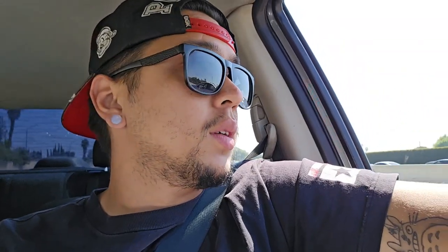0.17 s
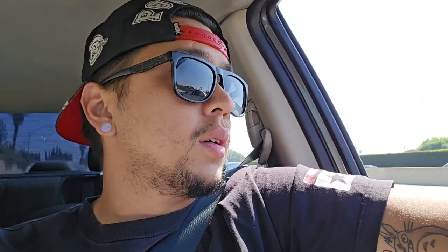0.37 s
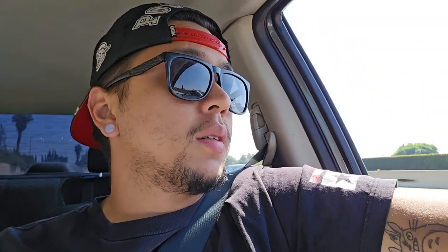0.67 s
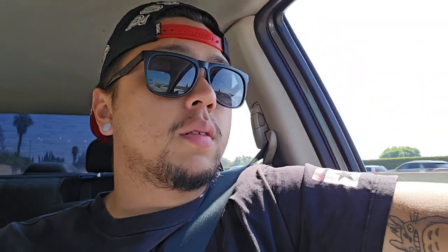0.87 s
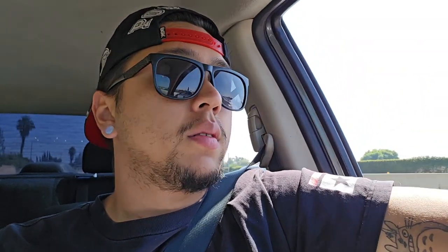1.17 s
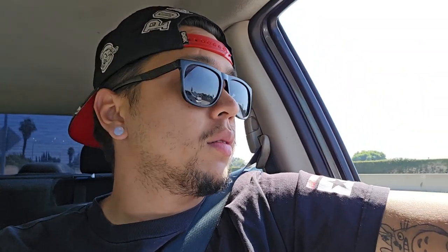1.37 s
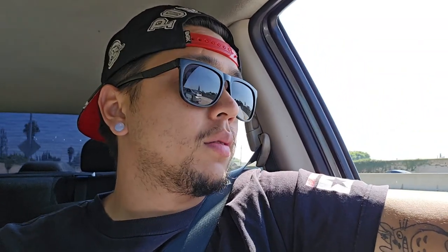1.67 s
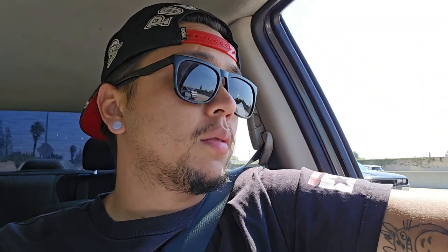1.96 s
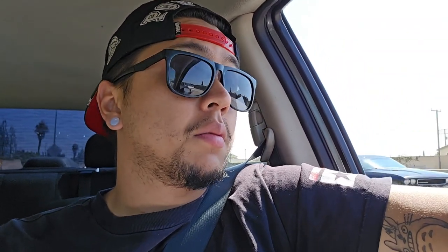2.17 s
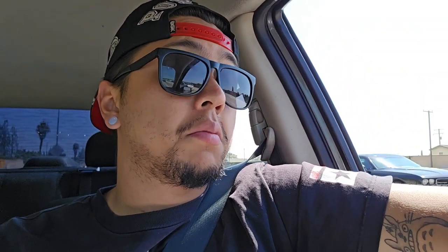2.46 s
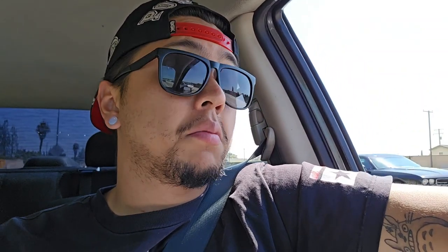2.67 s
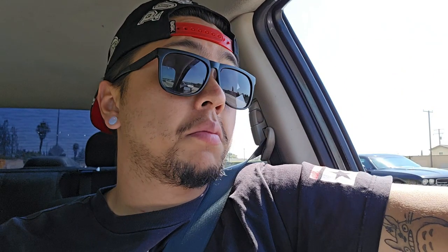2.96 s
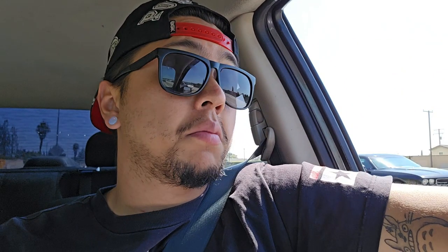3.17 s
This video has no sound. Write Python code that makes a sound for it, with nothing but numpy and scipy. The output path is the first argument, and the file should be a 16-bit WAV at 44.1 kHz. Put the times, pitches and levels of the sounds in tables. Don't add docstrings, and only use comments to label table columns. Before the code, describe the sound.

Deep road and wind rumble fills a car cabin throughout, mostly below 100 Hz, pulsing irregularly about eight times a second. Quieter tyre roar and thin window hiss lie above, the hiss easing around 1-2 s. Soft seam thumps scatter throughout; a small plastic tick snaps at 0.24 s. Around 2.4-2.6 s a neighbouring car's tyre noise swells modestly, with brief faint panel notes. Close phone stereo; it never stops.

```python
import sys
import numpy as np
from scipy import signal
from scipy.fft import rfft, irfft
from scipy.io import wavfile
from scipy.ndimage import uniform_filter1d

SR = 44100
rng = np.random.default_rng(int(sys.argv[2]) if len(sys.argv) > 2 else 0)


def pcm_store(signal):
    levels = np.round(np.clip(np.atleast_2d(signal), -1, 1) * 32767)
    wavfile.write(sys.argv[1], SR, levels.astype(np.int16).T)


def rack_gain(trim_db):
    fader = np.asarray(trim_db, float)
    return 10 ** (fader / 20)


N = 145530


def evened(x):
    return x / np.sqrt(np.mean(x ** 2) + 1e-20)


def smoothed(x, span):
    return uniform_filter1d(uniform_filter1d(x, span), span)


def low_part(x, corner_hz, order):
    hz = np.fft.rfftfreq(N, 1 / SR)
    return irfft(rfft(x) / (1 + (hz / corner_hz) ** order), N)


def read(points, hz):
    f, value = np.transpose(points)
    return np.interp(np.log(hz + 1), np.log(f + 1), value)


def closed(points, hz):
    low, top = points[0][0], points[-1][0]
    octaves_out = np.log2(np.maximum(low / (hz + 1), 1) * np.maximum(hz / top, 1))
    return read(points, hz) - 18 * octaves_out


def bumps(table, hz):
    return sum(lift / (1 + (2 * (hz - f) / width) ** 2) for f, width, lift in table)


def wander(rate_hz):
    t = np.arange(N) / SR
    rates = rate_hz * np.geomspace(1 / 20, 1, num=20)
    return evened(sum(np.sin(2 * np.pi * (f * t + rng.random())) / np.sqrt(f) for f in rates))


def along(table, column=1):
    rows = np.transpose(table)
    return np.interp(np.arange(N) / SR, rows[0], rows[column])


# frequency in Hz, lead of the left port in radians.
PORT_LEAD = [(0, -.3), (300, 0.05), (700, 1.3), (1300, 3.5), (2050, 6.9), (3000, 10.5), (16000, 57)]


def port_lag(hz):
    return np.array([[0], [1]]) * np.interp(hz, *np.transpose(PORT_LEAD))


# frequency in Hz, correlation from 0 to 1.
PORT_LIKENESS = [(45, .97), (170, .8), (350, .55), (600, .55), (900, .2), (1300, .5), (2050, .65),
                 (2500, .42), (6000, .3)]


def cabin_noise(colour, size, patch_db, patch_hz, patch_s):
    hop = size // 4
    hz = np.fft.rfftfreq(size, 1 / SR)
    a, b, c, d, patches = rng.standard_normal((N // hop + 5, len(hz), 5)).T
    patches = uniform_filter1d(patches, max(int(patch_hz * size / SR), 1), axis=0)
    patches = uniform_filter1d(patches, max(int(patch_s * SR / hop), 1), axis=1)
    same = np.clip(read(PORT_LIKENESS, hz), 0, 1)[:, None]
    turn = np.exp(-1j * port_lag(hz)[1])[:, None]
    left = a + 1j * b
    right = same * turn * left + np.sqrt(1 - same ** 2) * (c + 1j * d)
    z = np.array([left, right]) * rack_gain(colour(hz)[:, None] + patch_db * evened(patches))
    return evened(signal.istft(z, nperseg=size, noverlap=size - hop)[1][:, :N])


# peak time in seconds, peak in dB, length in seconds.
GUST_TIMES = [(0.022, -20, .08), (0.144, -13.5, 0.042), (.23, -21, 0.049), (0.326, -15, 0.084),
              (0.52, -13.5, 0.071), (0.6, -14.5, 0.057), (.77, -14, 0.073), (0.882, -17, 0.037),
              (0.946, -13.5, 0.053), (1.036, -14, 0.068), (1.17, -16, .05), (1.407, -17.5, 0.076),
              (1.491, -17.5, 0.038), (1.586, -14.5, 0.073), (1.717, -17.5, 0.042), (1.822, -14.5, .08),
              (1.973, -19.5, 0.063), (2.098, -13.5, 0.1), (2.215, -15, 0.049), (2.339, -14.5, 0.081),
              (2.48, -12.5, 0.079), (2.599, -14, 0.086), (2.704, -15, 0.076), (2.84, -13, 0.095),
              (3.001, -18, 0.092), (3.095, -12, 0.042), (3.19, -13.5, .08)]
LULL_DB = -22.5


def gusts():
    t = np.arange(N) / SR
    swells = sum(rack_gain(db) ** 2 * np.exp(-(2 * (t - s) / length) ** 2) for s, db, length in GUST_TIMES)
    return np.sqrt(rack_gain(LULL_DB) ** 2 + swells)


# time in seconds, level in dB, centre of the hum in Hz.
BOOM_DRIFT = [(0, -11, 46.6), (.28, -18, 45.2), (.44, -25, 45.5), (.52, -21, 45.06), (.7, -13, 54.05),
              (.79, -5, 55.66), (.86, -24, 52.45), (.98, -16, 52.66), (1.27, -20, 60.56), (1.5, -13, 50.25),
              (1.85, -20, 58.6), (2.02, -21, 43.75), (2.12, -7, 42.12), (2.35, -9, 40.23), (2.6, -8, 47.4),
              (2.8, -19, 33.9), (3.0, -12, 52.47), (3.2, -3, 38.09)]
# frequency in Hz, density in dB per Hz.
BOOM_SPECTRUM = [(7.1, -19), (12, -10), (32, 0), (49, 0.5), (66, -2.5), (114, -16.5), (149, -18.5),
                 (200, -28.5), (260, -41), (440, -120)]
WASH_DB, HUM_DB, HUM_WIDTH_HZ, HUM_EVEN = -1.5, -5, 6., .6
SURGE_TOP_HZ, SURGE_HOLD_S, SURGE_EVEN = 85., .05, .9
UPPER_DB, UPPER_FOLLOW = -16.5, .25


def boom():
    wash = cabin_noise(lambda hz: closed(BOOM_SPECTRUM, hz), size=8192, patch_db=0.55, patch_hz=12, patch_s=.3)
    r = np.exp(-np.pi * HUM_WIDTH_HZ / SR)
    swing = rng.standard_normal(N) + 1j * rng.standard_normal(N)
    swing = signal.lfilter([1], [1, -r], signal.lfilter([1], [1, -r], swing))
    swing = swing / (abs(swing) + 1e-9) ** HUM_EVEN
    phase = 2 * np.pi * np.cumsum(along(BOOM_DRIFT, column=2)) / SR
    hum = (swing * np.exp(1j * (phase - port_lag(0)))).real
    air = rack_gain(WASH_DB) * wash + rack_gain(HUM_DB) * evened(hum)
    deep = low_part(air, SURGE_TOP_HZ, 6)
    power = smoothed((deep ** 2).mean(0), int(SURGE_HOLD_S * SR / 2))
    steady = evened(deep / (power + .05) ** (SURGE_EVEN / 2))
    upper_db = UPPER_DB + UPPER_FOLLOW * (along(BOOM_DRIFT) - UPPER_DB)
    return gusts() * steady + rack_gain(upper_db) * (air - deep)


# frequency in Hz, density in dB per Hz.
ROAR_SPECTRUM = [(70, -2), (110, -2), (240, -9.5), (350, -14.5), (850, -18.5), (1500, -20.5), (2200, -27),
                 (2600, -36.5)]
# frequency in Hz, width in Hz, lift in dB.
BODY_MODES = [(93, 6.3, 5.5), (138, 11, 4.5), (167, 7.2, -9), (240, 22.3, 4.5), (328, 8.4, 4.5),
              (590, 51, 1), (789.5, 79, 5.5), (900, 29, 4), (1052, 16, 4.5), (1214, 59, 4), (1407, 45, 3),
              (1610, 49, 2), (2050, 190, 3.5), (2300, 89, 3)]
# time in seconds, coarseness in dB.
ROAD_COARSENESS = [(0, 1.5), (.4, 1), (.8, 0.8), (1.25, -0.5), (1.6, 1.44), (2.0, 0.36), (2.4, 2.5),
                   (2.9, -0.05), (3.3, -0.1)]
ROAR_DB, ROAR_SWELL_DB = -28, -0.12


def roar():
    x = cabin_noise(lambda hz: closed(ROAR_SPECTRUM, hz) + bumps(BODY_MODES, hz),
                    size=2048, patch_db=1, patch_hz=250, patch_s=0.096)
    return rack_gain(ROAR_DB + along(ROAD_COARSENESS) + ROAR_SWELL_DB * wander(7.7)) * x


# time in seconds, strength in dB, share of the low hiss in dB.
WIND_STRENGTH = [(0, -43.5, 0.2), (.5, -44.5, 2), (1.0, -47.5, 3), (1.3, -47, 0), (1.85, -47.5, 1),
                 (2.3, -44.5, 1), (2.46, -44.5, 1), (2.53, -42.5, 2.5), (2.62, -44, 0.5), (2.8, -42.5, 0.7),
                 (3.05, -42, 1), (3.22, -43.5, 3.5), (3.3, -44, 6)]
# frequency in Hz, density in dB per Hz.
WIND_SPECTRUM = [(1500, -0.5), (2750, 0), (3800, -2.5), (4200, -3), (6500, -11), (9000, -14.5),
                 (14000, -14), (15600, -13)]
# frequency in Hz, width in Hz, share from 0 up.
SEAL_MODES = [(3100, 700, 0.49), (3760, 680, 2), (5660, 1200, 1.2)]
WIND_FLUTTER_DB = 0.7


def wind():
    x = cabin_noise(lambda hz: read(WIND_SPECTRUM, hz) - 30 * (hz < 1200),
                    size=512, patch_db=0.6, patch_hz=400, patch_s=0.078)
    low = irfft(rfft(x) * np.clip(bumps(SEAL_MODES, np.fft.rfftfreq(N, 1 / SR)), 0, 1), N)
    strength = rack_gain(along(WIND_STRENGTH) + WIND_FLUTTER_DB * wander(40.02))
    return strength * (x + (rack_gain(along(WIND_STRENGTH, column=2)) - 1) * low)


# start in seconds, end in seconds, frequency in Hz, level in dB.
TREAD_WHINES = [
    (0.1, .45, 163, -33),
    (2.0, 2.95, 139, -35),
    (.75, 1.8, 780, -51),
    (2.2, 3.1, 770, -51),
    (2.4, 3.1, 1066, -49),
    (0, 1.2, 1636, -54),
]
WHINE_WIDTH_HZ = 3.


def whines():
    t, out = np.arange(N) / SR, np.zeros((2, N))
    for start, end, hz, db in TREAD_WHINES:
        turns = np.cumsum(hz + WHINE_WIDTH_HZ * (hz / 400) * wander(5.4)) / SR
        gate = np.clip(np.minimum(t - start + 0.1, end - t) / 0.074, 0, 1)
        level = gate * rack_gain(db + 1.35 * wander(7.2))
        out += np.sqrt(2) * level * np.sin(2 * np.pi * turns - port_lag(hz))
    return out


# time in seconds, peak in dB, pitch in Hz, left minus right in dB.
SEAM_HITS = [(.05, -29, 257, -15), (.222, -25.5, 164, 8), (0.279, -22.5, 164.5, 16), (0.284, -22.5, 250, 4),
             (0.903, -27.5, 545, 1), (0.896, -28, 349, -5), (.914, -23, 200, -10), (1.022, -27, 787.4, -3),
             (1.147, -21.5, 157, -11), (1.575, -26.5, 326, -8), (1.768, -26, 265, -17),
             (2.245, -28.5, 900, 13), (2.28, -27, 643.5, -1.1), (2.35, -30, 795, -9),
             (2.41, -28, 801.4, -3), (2.416, -23, 1043, 4.5), (2.69, -29, 212, .1), (2.79, -29.5, 296, 1)]
SEAM_RISE_S, SEAM_T60_S, SEAM_SPREAD = .006, .08, .12


def seams():
    t, out = np.arange(SR // 8) / SR, np.zeros((2, N + SR))
    shape = (1 - np.exp(-t / SEAM_RISE_S)) ** 2 * rack_gain(-60 * t / SEAM_T60_S)
    modes = ((1, 1), (1 + SEAM_SPREAD, .45), (1.9, .25))
    for s, db, hz, pan in SEAM_HITS:
        lag = port_lag(hz)
        thud = shape * sum(g * np.sin(2 * np.pi * (hz * k * t + rng.random()) - lag) for k, g in modes)
        sides = rack_gain(db + np.array([[pan / 2], [-pan / 2]]))
        out[:, round(s * SR):][:, :len(t)] += thud / abs(thud).max() * sides
    return out[:, :N]


# time in seconds, peak in dB, pitch factor, tilt of the upper modes in dB per octave.
TRIM_SNAPS = [
    (.2338, -29, .8, -3),
    (.2376, -19, 1, .5),
    (.2387, -28, 1, -1),
    (.2432, -31, 1, 1),
    (.2455, -27, .98, -18),
]
# frequency in Hz, level in dB, T60 in seconds.
TRIM_MODES = [(3850, -5, .009), (4700, -4, .014), (5750, 0, .008), (6600, -8, .005), (7200, -2, .008),
              (7900, -7, .006), (10200, -2, .004), (12000, -11, .004), (13800, -11, .004),
              (15400, -7, .004)]
TICK_PAN_DB, TICK_TAIL_DB, TICK_TAIL_S, TICK_RISE_S = 5, -17, .04, .0002


def tick():
    t, out = np.arange(SR // 10) / SR, np.zeros((2, N))
    for s, db, pitch, upper_db in TRIM_SNAPS:
        snap = np.zeros((2, len(t)))
        for hz, mode_db, t60 in TRIM_MODES:
            tilt_db = upper_db * np.log2(hz / TRIM_MODES[0][0])
            phase = 2 * np.pi * rng.random((2, 1))
            snap += rack_gain(mode_db + tilt_db - 60 * t / t60) * np.sin(2 * np.pi * hz * pitch * t + phase)
        tail = signal.lfilter([1, 0, 0, 0, -1], [1], rng.standard_normal((2, len(t))))
        tail = tail * rack_gain(TICK_TAIL_DB - 60 * t / TICK_TAIL_S)
        rise = np.minimum(t / TICK_RISE_S, 1)
        out[:, round(s * SR):][:, :len(t)] += rack_gain(db) * rise * (snap / abs(snap).max() + tail / 2)
    return out * rack_gain(np.array([[TICK_PAN_DB / 2], [-TICK_PAN_DB / 2]]))


# centre in seconds, length in seconds, frequency in Hz, peak in dB.
FLUTTER_NOTES = [(.965, .09, 780, -36), (1.085, .05, 880, -38), (1.04, .06, 1240, -41),
                 (1.782, .045, 270, -27), (.92, .04, 240, -27), (3.03, .06, 240, -29),
                 (2.235, .04, 630, -33), (2.385, .04, 660, -32), (2.425, .035, 720, -30),
                 (2.43, .035, 900, -30), (2.415, .04, 1060, -31), (2.375, .05, 840, -33),
                 (2.38, .05, 1450, -38), (2.45, .12, 2040, -39), (2.515, .04, 1230, -35),
                 (2.535, .06, 1480, -37), (2.68, .05, 1410, -38), (2.6, .07, 1060, -37),
                 (2.66, .07, 760, -38), (2.8, .05, 1050, -37), (3.005, .06, 1050, -34),
                 (2.52, .06, 4950, -49), (2.53, .06, 5600, -50), (2.79, .06, 4750, -49),
                 (2.85, .07, 4800, -50), (3.06, .06, 5500, -51), (3.155, .06, 3170, -45),
                 (3.12, .05, 3800, -48), (3.28, .05, 3370, -44)]
FLUTTER_SPREAD, FLUTTER_LAG_SHARE = .012, .2


def flutters():
    t, out = np.arange(N) / SR, np.zeros((2, N))
    for s, length, hz, db in FLUTTER_NOTES:
        part = slice(round((s - length) * SR), round((s + length) * SR))
        u, lag = t[part], FLUTTER_LAG_SHARE * port_lag(hz)
        note = np.sin(2 * np.pi * hz * u - lag)
        note = note + .3 * np.sin(2 * np.pi * hz * (1 + FLUTTER_SPREAD) * u - lag)
        out[:, part] += rack_gain(db) * np.exp(-(3 * (u - s) / length) ** 2) * note
    return out


# frequency in Hz, density in dB per Hz.
PASS_SPECTRUM = [(350, -52), (650, -14), (900, 2), (1500, 2), (2100, -8), (2800, -1.5), (5000, -46),
                 (9000, -34)]
PASS_S, PASS_DB, PASS_RISE_S, PASS_FALL_S = 2.38, -36.5, .16, .2
PASS_BRIGHT_LAG_S, PASS_SPLIT_HZ = .2, 1150.


def passing_car():
    x = cabin_noise(lambda hz: closed(PASS_SPECTRUM, hz), size=1024, patch_db=3.5, patch_hz=200, patch_s=.04)
    dull = low_part(x, PASS_SPLIT_HZ, 4)
    t = np.arange(N) / SR - PASS_S - np.array([[0], [PASS_BRIGHT_LAG_S]])
    near_dull, near_bright = 1 / (1 + (t / np.where(t < 0, PASS_RISE_S, PASS_FALL_S)) ** 2)
    return rack_gain(PASS_DB) * (near_dull * dull + near_bright * (x - dull))


RIPPLE_DB, RIPPLE_HZ = .8, 45.


def scene():
    x = boom() + roar() + wind() + whines() + seams() + tick() + flutters() + passing_car()
    hz = np.fft.rfftfreq(N, 1 / SR)
    ripple = evened(smoothed(rng.standard_normal((2, len(hz))), int(RIPPLE_HZ * N / SR)))
    above_bass = np.clip(hz / 1500, 0, 1)
    return irfft(rfft(x) * rack_gain(RIPPLE_DB * ripple * above_bass), N)


def band_limit(x):
    return signal.sosfilt(signal.butter(12, 15910, fs=SR, output="sos"), x)


# frequency in Hz, width in Hz, lift in dB.
PORT_MODES = [(7650, 190, 5), (10510, 970, -8.5), (11510, 1100, 10.5)]
# frequency in Hz, left minus right in dB.
PORT_TILT = [(200, 0.6), (900, 0.7), (1500, -0.5), (2300, -4), (4000, -0.7), (9000, 4.5), (11500, -2.5),
             (14000, 6.5)]
LIMIT, EDGE_HZ = 0.92, 15725


def record(dry):
    hz = np.fft.rfftfreq(N, 1 / SR)
    sides_db = np.array([[.5], [-.5]]) * read(PORT_TILT, hz)
    x = irfft(rfft(dry) * rack_gain(bumps(PORT_MODES, hz) + sides_db), N)
    x = LIMIT * np.tanh(x / LIMIT)
    x = irfft(rfft(x) * (hz < EDGE_HZ), N)
    return band_limit(x)


dry = scene()
out = record(dry)
pcm_store(out)
```